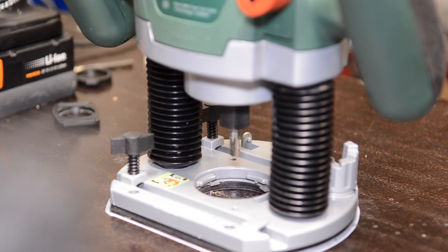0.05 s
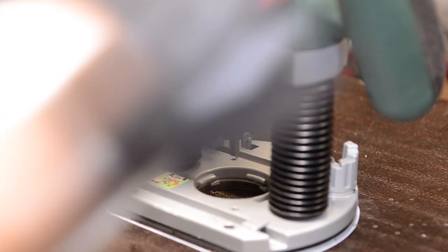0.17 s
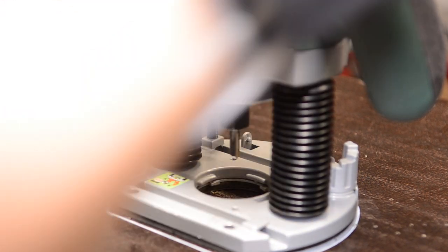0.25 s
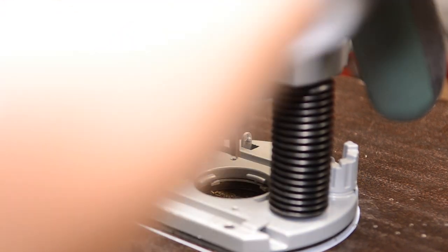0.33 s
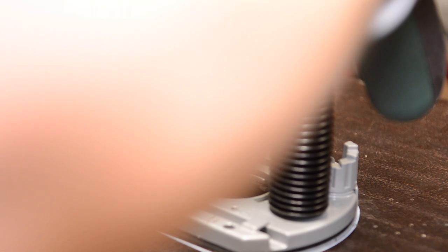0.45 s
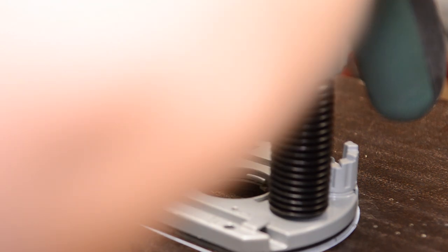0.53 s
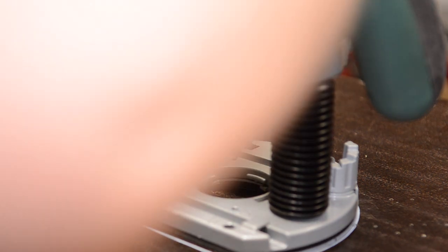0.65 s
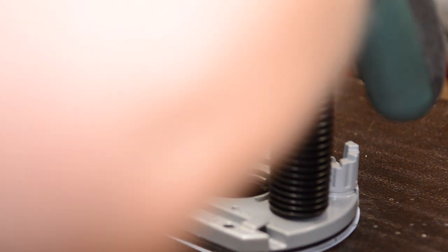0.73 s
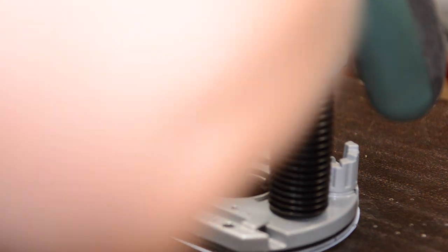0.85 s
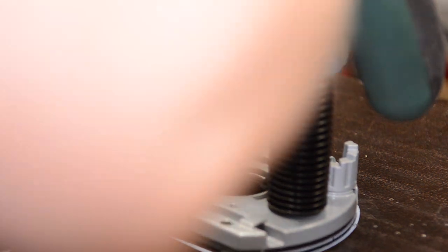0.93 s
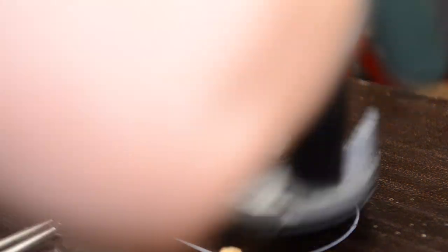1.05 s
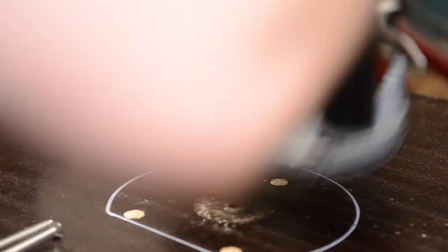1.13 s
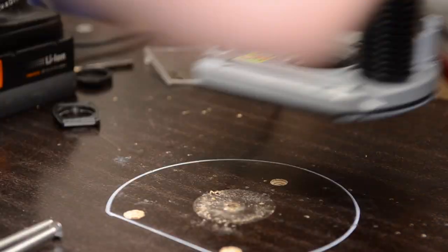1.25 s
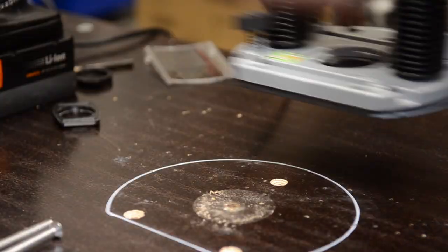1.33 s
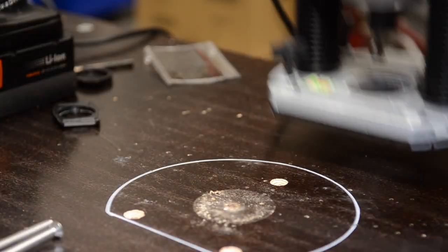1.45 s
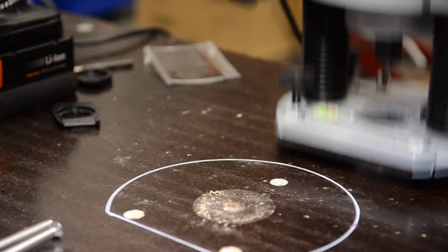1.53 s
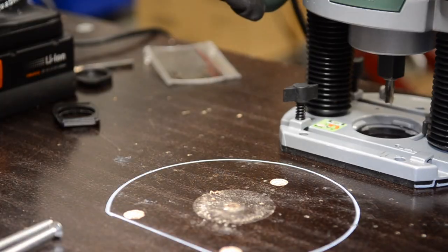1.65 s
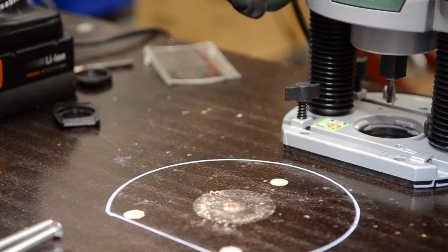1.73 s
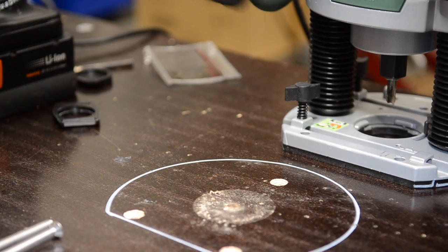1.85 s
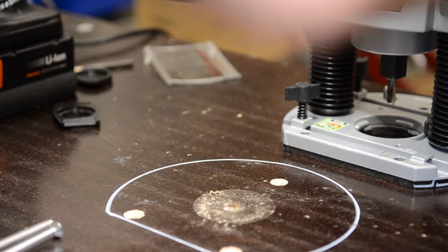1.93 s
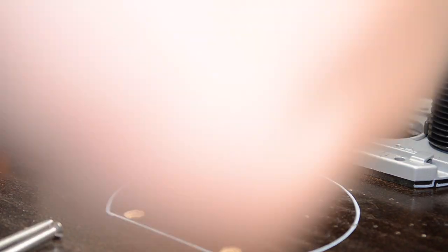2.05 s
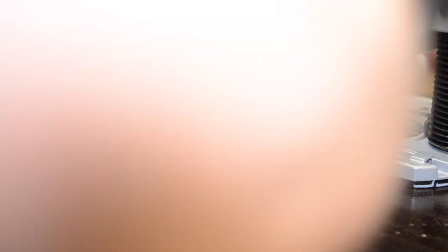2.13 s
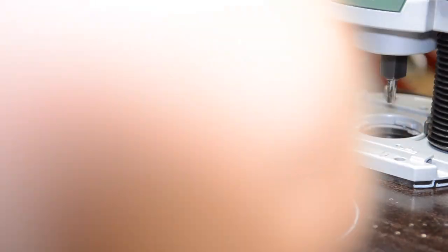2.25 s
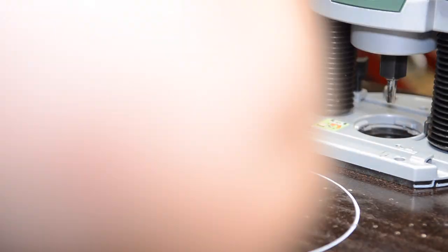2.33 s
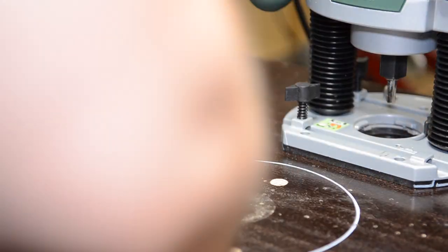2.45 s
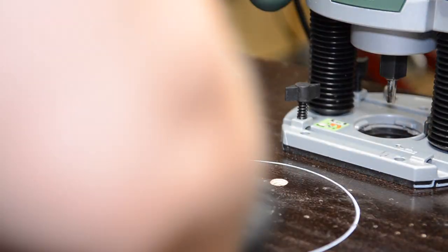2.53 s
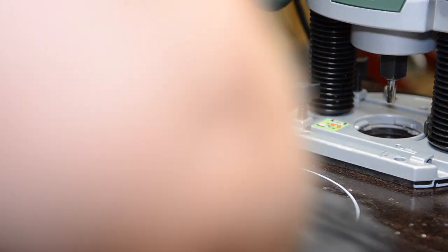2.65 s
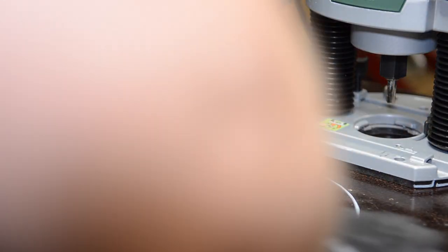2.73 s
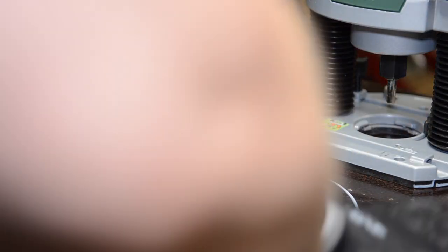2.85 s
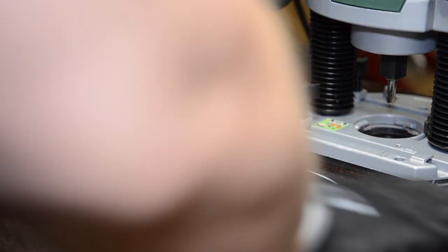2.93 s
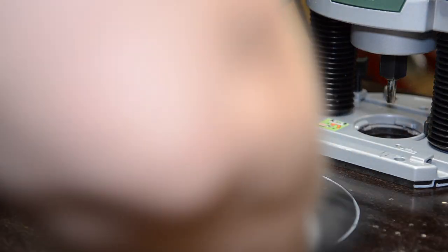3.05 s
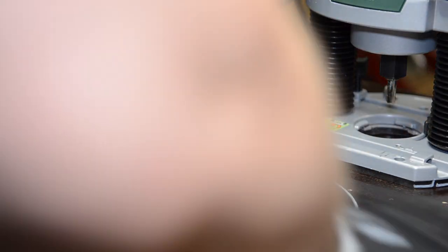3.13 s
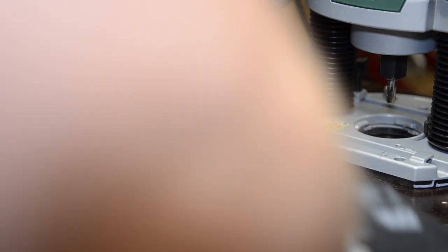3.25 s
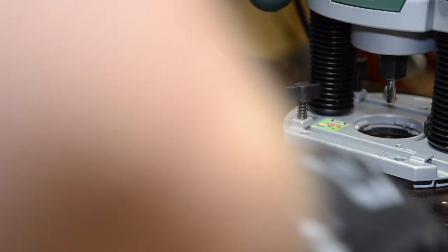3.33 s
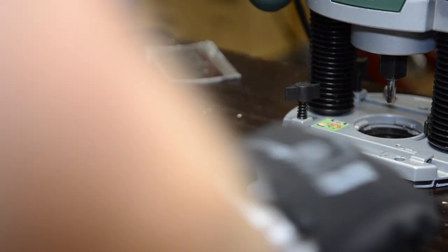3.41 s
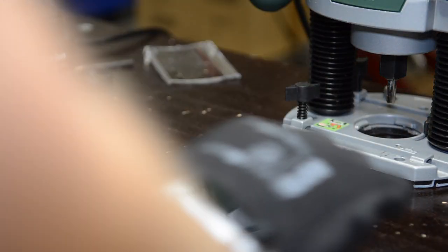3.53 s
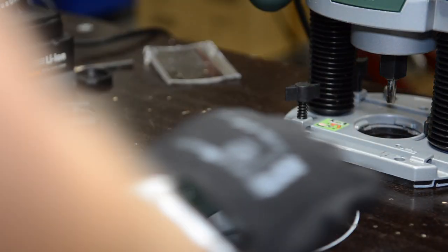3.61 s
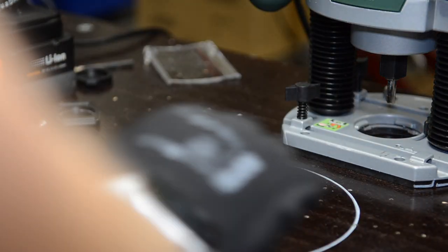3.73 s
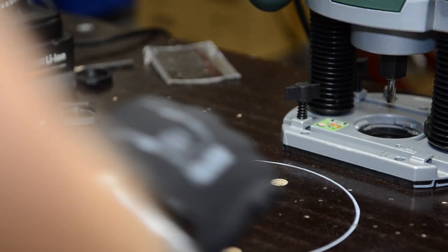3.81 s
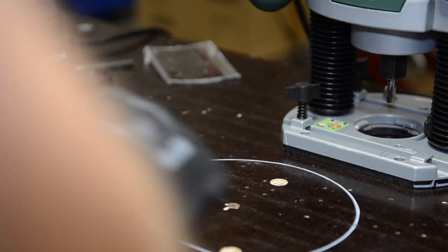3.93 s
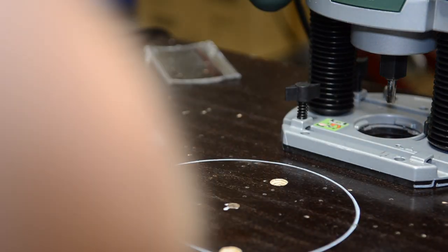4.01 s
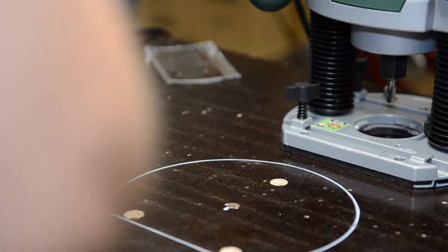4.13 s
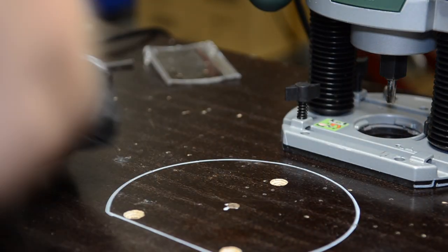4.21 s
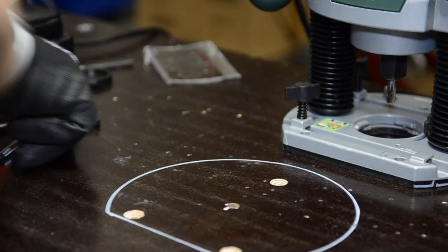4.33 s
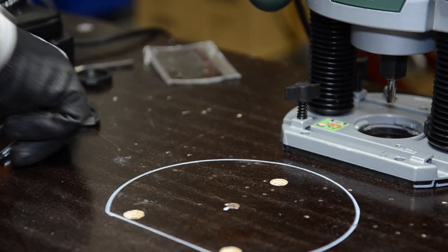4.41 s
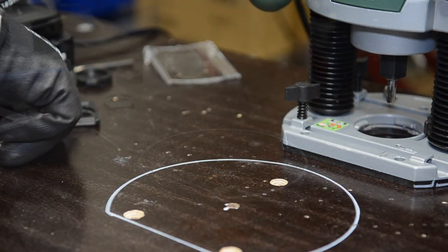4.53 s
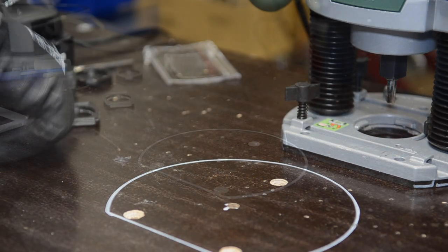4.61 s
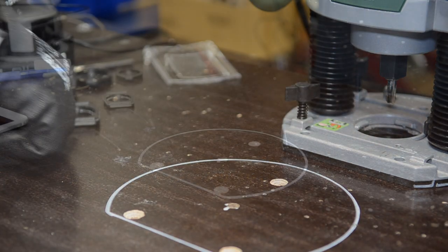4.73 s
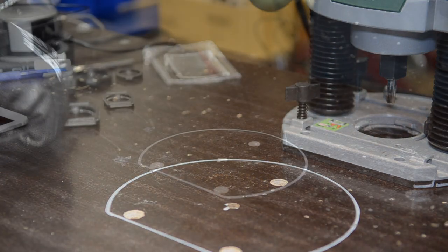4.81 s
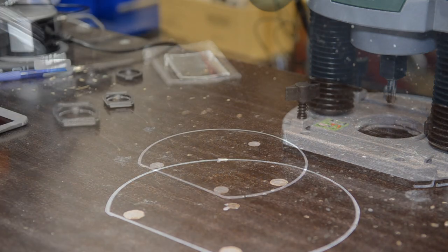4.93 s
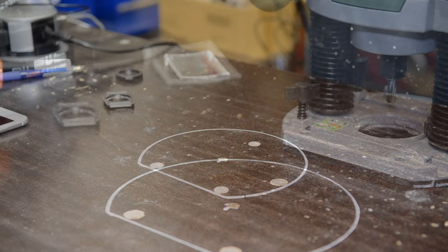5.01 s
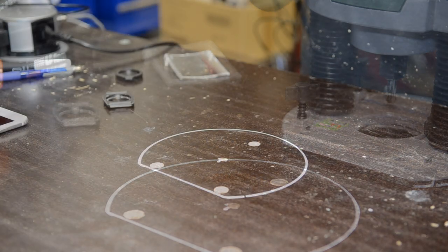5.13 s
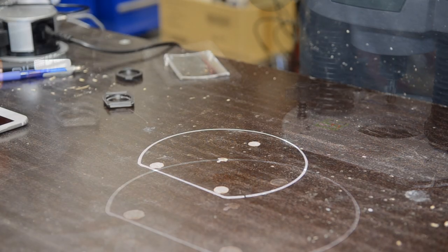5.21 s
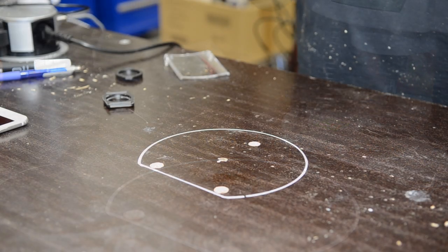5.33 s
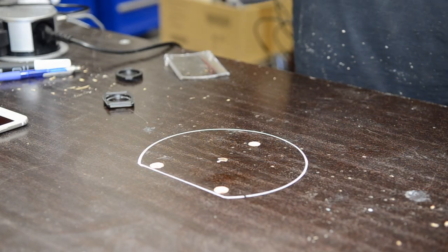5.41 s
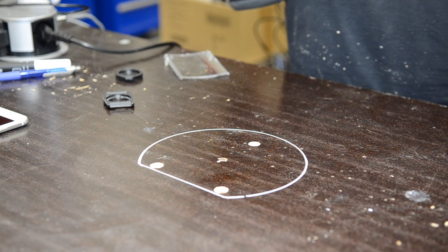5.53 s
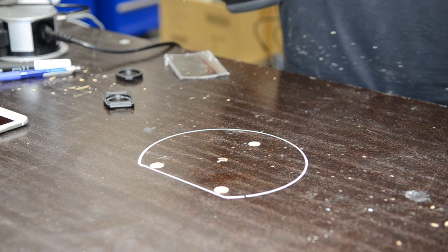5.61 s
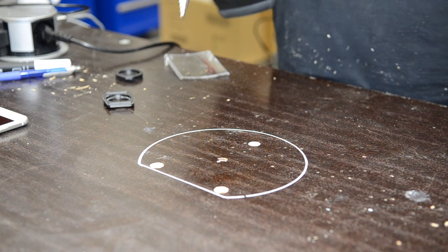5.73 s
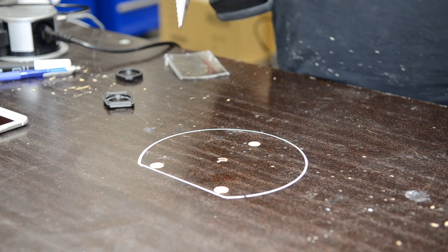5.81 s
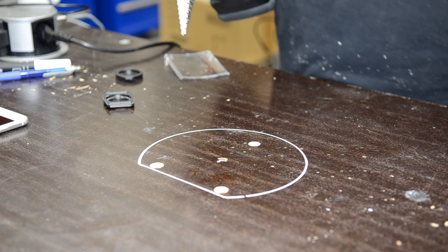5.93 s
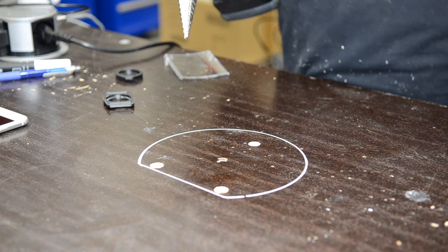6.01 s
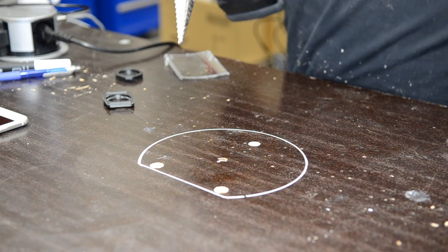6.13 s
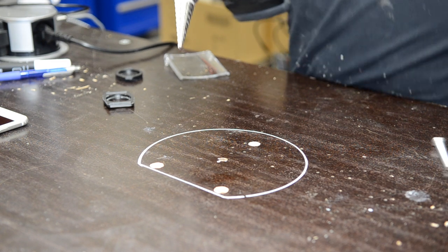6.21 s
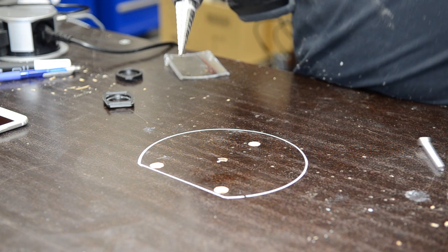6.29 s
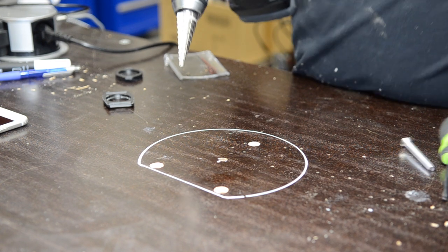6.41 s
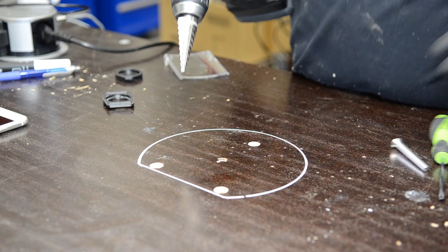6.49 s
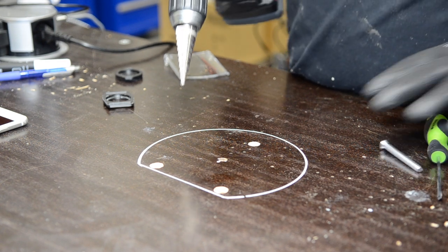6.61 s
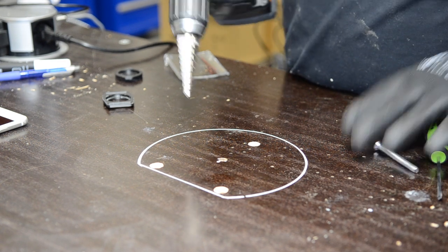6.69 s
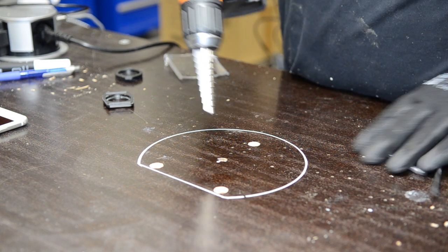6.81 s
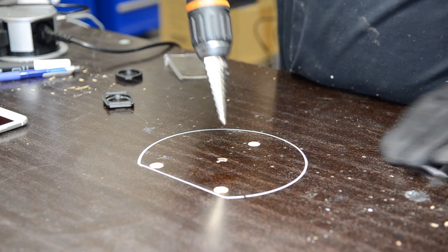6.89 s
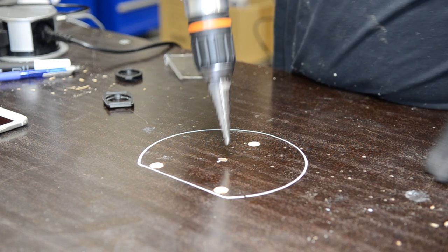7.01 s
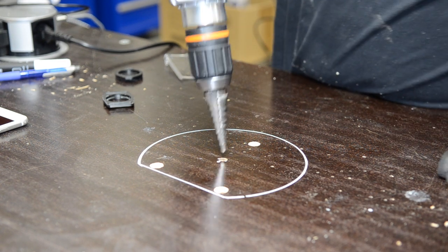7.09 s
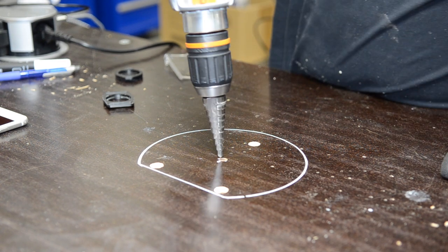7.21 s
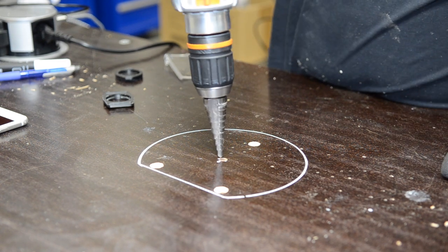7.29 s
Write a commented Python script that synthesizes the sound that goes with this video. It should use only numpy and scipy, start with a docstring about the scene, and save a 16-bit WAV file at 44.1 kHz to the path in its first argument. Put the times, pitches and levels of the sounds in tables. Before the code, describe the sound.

A small part bounces on a wooden workbench, a router lands, parts slide and squeak, screws clink, heavy bumps follow, then steel scrapes along.

```python
"""A dropped part bounces on a wooden workbench, a router lands at 1.6 s, then parts slide and squeak over the top.
Steel screws chime at 4.5 s, heavy bumps and a rattling tool follow at 5 s, then steel scrapes along with slides.
Contacts excite decaying modes and filtered noise bursts; friction and cloth are random grains; squeaks are rough tones.
Noise reflections form a small workshop; still air lies under all, a low sine hum fades out from 5.18 s."""
import sys
import numpy as np
from scipy import signal
from scipy.fft import rfft, irfft
from scipy.io import wavfile
from scipy.ndimage import map_coordinates

SR = 44100
rng = np.random.default_rng(int(sys.argv[2]) if len(sys.argv) > 2 else 0)


def generate_wav(sig):
    """Save sig (samples, or channels by samples) to the path in sys.argv[1] as 16-bit PCM at SR."""
    pcm = np.round(np.clip(np.atleast_2d(sig).T, -1, 1) * 32767).astype(np.int16)
    wavfile.write(sys.argv[1], SR, pcm)


N = 324120
TIME = np.arange(N) / SR
RING = TIME[:SR // 2]  # time axis of one contact, s

# Bench top under a heavy blow. Each row: nominal mode in Hz, relative level in dB, t60 in seconds.
BENCH = [(95, -0.5, 0.12), (171, -7, 0.26), (200.8, -13, 0.42), (235.7, -6, 0.11), (343, 11.5, 0.042),
         (621, -9.5, 0.09), (675, -3.5, 0.08), (858, -3.5, 0.24), (1140, 4.5, 0.049), (1340, -4, .03)]
# Bench top under a small hard part. Each row: nominal mode in Hz, relative level in dB, t60 in seconds.
PATCH = [(654, -5, 0.052), (904, 2, 0.014), (1140, 7, 0.02), (1179, -8.5, 0.059), (1638, -7, 0.063),
         (1740, -4.5, 0.0077)]
# Spectrum of the dense short-lived modes behind a heavy blow. Each row: frequency in Hz, relative level in dB.
BLOW_COLOUR = [(50, -30.5), (150, 5.5), (350, -4.5), (500, 1.5), (1000, 2), (1700, -2.5), (3000, -7),
               (4200, -15), (7000, -21.5), (9500, -39), (15000, -50)]
# Spectrum of friction slips and snags. Each row: frequency in Hz, relative level in dB.
SLIDE_COLOUR = [(100, 18), (240, -1), (400, -14), (580, 0.5), (900, 7.5), (1420, 3.5), (1700, 4),
                (2050, -8.5), (2400, -5), (3000, -12), (3700, -33), (15000, -43)]


def undb(db):
    """Decibels to gain."""
    return 10 ** (np.asarray(db) / 20)


def unit(x):
    """Scale to an energy of one."""
    return x / np.sqrt(np.sum(x ** 2))


def steady(x):
    """Scale to a standard deviation of one."""
    return x / np.std(x)


def fade(t, t60):
    """Exponential decay, 60 dB down after t60."""
    return np.exp(-np.log(1000) * t / t60)


def cut(x, hz, kind, order=2):
    """Butterworth low-pass or high-pass."""
    return signal.sosfilt(signal.butter(order, min(hz, SR * .45), kind, fs=SR, output="sos"), x)


def through(x, response):
    """Let x excite something with this impulse response."""
    return signal.fftconvolve(x, response)[:len(x)]


def colour(x, points, size=4096):
    """Minimum-phase filter with a spectrum of (Hz, dB) points."""
    hz, db = np.transpose(points)
    grid_hz = np.maximum(np.arange(size // 2 + 1) * SR / size, 1)
    gain_db = np.interp(np.log(grid_hz), np.log(hz), db)
    cepstrum = irfft(np.log(undb(gain_db)))
    # fold the cepstrum to make the response causal
    cepstrum[1:size // 2] *= 2
    cepstrum[size // 2 + 1:] = 0
    return through(x, irfft(np.exp(rfft(cepstrum))))


def wander(hz):
    """Low-passed noise with a spread of one."""
    return steady(cut(rng.standard_normal(N), hz, "low"))


def drift(x, share, hz):
    """Resonances slide up and down as the contact point travels: time is read at a wandering speed."""
    return map_coordinates(x, [np.arange(N) + np.cumsum(share * wander(hz))], mode="mirror")


def grains(per_s, spread_db):
    """Tiny slips at random moments, of uneven size and random sign."""
    hits = rng.random(N) < per_s / SR
    size_db = spread_db * np.clip(rng.standard_normal(N), -2, 2)
    return hits * rng.choice([-1, 1], N) * undb(size_db)


def ring(modes, scatter=0.0061):
    """Decaying modes of alternating sign; each contact loads them a little differently."""
    total = 0
    for k, (hz, db, t60) in enumerate(modes):
        loaded_hz = hz * (1 + scatter * rng.standard_normal())
        total = total + (-1) ** k * undb(db) * fade(RING, t60) * np.sin(2 * np.pi * loaded_hz * RING)
    return unit(total)


def crack(points, t60, tick_db):
    """The first push of a contact and the dense modes that die right after it."""
    burst = unit(rng.standard_normal(len(RING)) * fade(RING, t60))
    burst[0] += undb(tick_db)
    return unit(colour(burst, points))


def add(track, s, db, sound):
    """Place a sound at s; db is its energy spread over 10 ms."""
    start = max(int(s * SR), 0)
    part = (unit(sound) * undb(db) * np.sqrt(SR / 100))[:N - start]
    track[start:start + len(part)] += part


def strikes(table, modes, points, modes_db, crack_t60, tick_db):
    """Blows on the bench: a soft contact loses the treble, a light part cannot move the bass."""
    out = np.zeros(N)
    for s, db, corner_hz, bass_hz in table:
        body = crack(points, crack_t60, tick_db) + undb(modes_db) * ring(modes)
        add(out, s, db, cut(cut(body, corner_hz, "low"), bass_hz, "high"))
    return out


def router(modes_db=-3.5, snap_t60=0.013):
    """The router lands and rocks on its metal base, with sharp snaps and a boom of the bench."""
    # Each row: start in seconds, level in dB, contact corner in Hz, bass cut in Hz.
    landings = [(1.5971, -11, 5660, 170), (1.609, -20, 416, 299), (1.657, -22.5, 455, 84)]
    # Each row: start in seconds, level in dB.
    snaps = [(1.5969, -24.5), (1.708, -54)]
    # Each row: frequency in Hz, relative level in dB.
    snap_colour = [(500, -13), (1100, 15.5), (1900, -0.5), (2900, -2), (4000, -4), (7400, -3), (9200, -14),
                   (15500, -37)]
    out = strikes(landings, BENCH, BLOW_COLOUR, modes_db, crack_t60=0.032, tick_db=-4.0)
    for s, db in snaps:
        add(out, s, db, crack(snap_colour, snap_t60, tick_db=-5))
    return out


def thumps():
    """Heavy things bump the bench and excite its low bending modes."""
    # Each row: start in seconds, level in dB, contact corner in Hz, bass cut in Hz.
    bumps = [(.947, -49.5, 206, 88.6), (2.47, -48, 194, 79.6), (3.535, -47.5, 342, 223),
             (4.633, -39, 300, 220), (4.917, -21.5, 1010, 131), (4.923, -23, 217, 69),
             (4.981, -23, 1130, 160), (4.987, -35, 905, 300), (5.031, -30.5, 885, 110),
             (5.064, -32.5, 334, 60), (5.098, -30.5, 150, 121), (5.225, -36.5, 133, 105),
             (5.650, -38, 280, 40), (5.672, -37, 166, 60.5), (5.76, -48, 760, 201),
             (6.118, -39, 600, 101.5), (6.788, -35, 590, 240), (7.19, -37, 160, 59.3)]
    return strikes(bumps, BENCH, BLOW_COLOUR, modes_db=-5.5, crack_t60=0.085, tick_db=-8.5)


def bounces(count=7, drop_s=0.0102, drop_db=-24.5, corner_hz=3100, bass_hz=383,
            first_hop_s=.0305, restitution=.82, hop_loss_db=1.54):
    """Clacks of the dropped part: every hop lasts a fixed share of the one before and lands weaker."""
    hop = np.arange(count)
    hops_s = first_hop_s * restitution ** hop[:-1]
    times = drop_s + np.append(0, np.cumsum(hops_s))
    return [(s, drop_db - hop_loss_db * k, corner_hz, bass_hz) for k, s in enumerate(times)]


def clacks():
    """Small hard parts, among them the bouncing one, excite a patch of the bench top."""
    # Each row: start in seconds, level in dB, contact corner in Hz, bass cut in Hz.
    knocks = [(0.852, -43.5, 3620, 950), (2.498, -43, 1470, 810), (3.513, -34, 3000, 298),
              (4.6285, -18.5, 5030, 850), (4.6345, -25.5, 1200, 400), (5.0612, -27, 750, 1000),
              (5.079, -32, 3220, 690), (5.155, -34.5, 1300, 596), (5.649, -47, 1490, 914),
              (6.451, -39.5, 1710, 302)]
    # Each row: frequency in Hz, relative level in dB.
    clack_colour = [(100, -20), (300, 0), (600, 5), (1150, 3.5), (1900, -1.5), (3300, -5.5), (3900, -22),
                    (7000, -22), (15000, -20.5)]
    return strikes(bounces() + knocks, PATCH, clack_colour, modes_db=-4, crack_t60=.03, tick_db=-9)


def blows():
    """Everything that strikes the bench: the router, heavy bumps and small hard parts."""
    return router() + thumps() + clacks()


def steel(tick_db=-13.5, tick_t60=0.018, choke_t60=0.012, rattle_t60=0.35):
    """Screws tick and chime in two bending modes, each touch choking the last; a larger tool rattles."""
    # Each row: start in seconds, level in dB, second mode minus first in dB.
    chimes = [(.002, -38.5, 4), (0.162, -62, 14), (3.47, -64, 17), (3.515, -58, 6), (4.459, -35.5, -1),
              (4.487, -44.5, -2), (4.5091, -36.5, 9), (4.52, -37, 26), (4.539, -37.5, 9),
              (4.547, -43, 32.5), (4.552, -56, 36), (4.629, -38, 25), (4.634, -52, 22), (7.02, -71, 7)]
    # Bending modes of a screw. Each row: nominal frequency in Hz, t60 in seconds.
    screw = [(4790, 0.2), (12945, 0.19)]
    # Each row: start in seconds, level in dB.
    rattles = [(5.077, -30), (5.096, -36)]
    # Each row: nominal mode in Hz, relative level in dB, t60 in seconds.
    tool = [(980, 10.5, 0.063), (1580, 7, 0.028), (2235, 6.5, 0.027), (2820, 1, 0.026), (3640, 0, 0.022),
            (4300, 4.5, 0.0022), (9400, -42, 0.34)]
    out = np.zeros(N)
    (low_hz, low_t60), (high_hz, high_t60) = screw
    gaps = np.diff([row[0] for row in chimes], append=TIME[-1])
    for (s, db, high_db), gap in zip(chimes, gaps):
        tick = unit(cut(rng.standard_normal(len(RING)) * fade(RING, tick_t60), 5000, "high"))
        chime = ring([(low_hz, 0, low_t60), (high_hz, high_db, high_t60)], scatter=0.0039)
        chime = chime * fade(np.maximum(RING - gap, 0), choke_t60)
        add(out, s, db, unit(chime) + undb(tick_db) * tick)
    for s, db in rattles:
        hits = grains(per_s=370, spread_db=1)[:len(RING)] * fade(RING, rattle_t60)
        add(out, s, db, through(hits, ring(tool, scatter=0.013)))
    return out


def push(s, length, swell_db, attack_s=0.049, t60_s=0.19, coast_per_length=2.5):
    """A stroke starts quickly, its pressure grows or eases evenly, then it coasts to rest; a short jab stops sooner."""
    t = TIME - s
    start = np.clip(t / min(attack_s, length), 0, 1)
    coast = fade(np.maximum(t - length, 0), min(t60_s, coast_per_length * length))
    return start * undb(swell_db * (np.clip(t / length, 0, 1) - .5)) * coast


def slides(modes_db=-2, judder_hz=50, judder_db=1.5, top_hz=1900, dull_hz=6000, drift_share=.05,
           body_edge_hz=405, edge_hz_per_db=7.5):
    """Stick-slip grains ring the bench; weight brings out its bass, a biting edge its treble."""
    # Each row: start in seconds, length in seconds, level at mid-swell in dB, swell over the stroke in dB,
    # weight as bass in dB re level, bite as treble in dB re level.
    strokes = [(-.03, 0.19, -36.5, -19, -17.5, -1.5), (1.274, 0.33, -53, 0, -15.5, -10),
               (2.25, 0.38, -54, 4, -20.5, -9), (2.583, 0.39, -36, 4, -34.5, -17.5),
               (2.974, 0.42, -36, 4.5, -34.5, -17.5), (3.326, 0.15, -44.5, 9, -22, -14),
               (3.501, 0.083, -34, -16.5, -15.5, -9), (4.405, 0.026, -44, -3, -29, -7),
               (4.423, 0.13, -34.5, 4, -17, -7), (4.618, 0.022, -29, -0.5, -25, 4.5),
               (5.851, 0.3, -42, 1, -11.5, -22), (6.148, 0.4, -48, -5.5, -9, -27),
               (6.791, 0.35, -42, 4.5, -16, -13.5)]
    slips = grains(per_s=2600, spread_db=-0.5) * undb(judder_db * wander(judder_hz))
    # as the part travels it passes the nodes and bellies of each mode
    modes = 0
    for hz, db, t60 in PATCH:
        modes = modes + undb(db + 2.5 * wander(9)) * through(slips, ring([(hz, 0, t60)]))
    modes = steady(drift(modes, drift_share, hz=6))
    wood = steady(colour(slips, SLIDE_COLOUR)) + undb(modes_db) * modes
    bass = steady(cut(cut(wood, 460, "low", order=6), 171, "high", order=4))
    treble = steady(cut(cut(wood, top_hz, "high", order=6), dull_hz, "low"))
    out = np.zeros(N)
    for s, length, db, swell_db, weight_db, bite_db in strokes:
        # the lighter the part, the higher the lower edge of the wood's tone
        edge_hz = body_edge_hz - edge_hz_per_db * weight_db
        body = steady(cut(cut(wood, edge_hz, "high", order=4), top_hz, "low", order=4))
        tone = body + undb(weight_db) * bass + undb(bite_db) * treble
        out += undb(db) * push(s, length, swell_db) * tone
    return out


def catches(corner_hz=4000, bass_hz=700):
    """A sliding part snags on the grain and lets go with a dry tick."""
    # Each row: start in seconds, level in dB.
    snags = [(2.347, -47.5), (2.836, -33), (2.87, -40), (3.057, -36), (3.125, -42), (3.301, -38),
             (3.398, -37), (5.866, -54), (5.987, -39.5), (6.04, -40.5), (6.305, -42), (7.108, -43.5)]
    table = [(s, db, corner_hz, bass_hz) for s, db in snags]
    return strikes(table, PATCH, SLIDE_COLOUR, modes_db=-3.5, crack_t60=0.043, tick_db=-1)


def squeaks(jitter=.06, rough_db=2.5, stumble_hz=160, upper_ratio=1.7, upper_db=-8):
    """Friction drives two modes of the part; their pitch and strength stumble from slip to slip."""
    # Each row: start in seconds, length in seconds, level over that length in dB,
    # starting and final centre pitch of the lower mode in Hz.
    chatters = [(0.369, 0.088, -62, 2470, 2620), (0.951, 0.033, -64, 3710, 3540),
                (1.313, 0.48, -59, 803, 793), (2.286, 0.058, -43.5, 1136, 1045),
                (2.401, 0.061, -49, 1092, 1136), (2.638, 0.15, -36, 1185, 925),
                (2.789, 0.088, -33.5, 1053, 976), (2.937, 0.052, -42.5, 1121, 1174),
                (3.078, 0.08, -38.5, 955, 1052), (3.265, 0.097, -37.5, 1014, 1200),
                (3.356, 0.025, -37, 852, 845), (4.42, 0.034, -28.5, 1214, 1078),
                (4.461, 0.066, -45, 1182, 1155), (4.54, 0.017, -25.5, 1196, 1123),
                (5.888, 0.039, -43, 1133, 1120), (6.483, .17, -52, 765, 642),
                (6.678, 0.073, -51.5, 725, 730)]
    out = np.zeros(N)
    for s, length, db, first_hz, last_hz in chatters:
        hz = np.interp(RING, [0, length], [first_hz, last_hz])
        tone = 0
        for ratio, mode_db in (1, 0), (upper_ratio, upper_db):
            pitch, size = steady(cut(rng.standard_normal((2, len(RING))), stumble_hz, "low"))
            phase = 2 * np.pi * np.cumsum(ratio * hz * (1 + jitter * pitch)) / SR
            tone = tone + undb(mode_db + rough_db * size) * np.sin(phase)
        gate = np.clip(np.minimum(RING, length - RING) / .004 + .5, 0, 1)
        build = 1 - fade(RING, length * .6)
        # add() refers levels to 10 ms
        add(out, s, db + 10 * np.log10(length * 100), tone * gate * build)
    return out


def scrapes(per_s=450, spread_db=3, judder_hz=22, judder_db=3):
    """A steel shank rasps in fits and starts: coarse grains excite its own modes, which shift as it rolls."""
    # Each row: start in seconds, length in seconds, level at mid-swell in dB, swell over the stroke in dB.
    drags = [(5.86, 0.47, -49.5, -4), (6.79, 0.352, -44, 7)]
    # Each row: nominal mode in Hz, relative level in dB, t60 in seconds.
    shank = [(700.6, -5, 0.071), (1677, -4.5, 0.042), (2343, -2.5, 0.02), (2960, -6.5, 0.0054)]
    grit = grains(per_s, spread_db) * undb(judder_db * wander(judder_hz))
    rasp = steady(drift(through(grit, ring(shank)), share=.025, hz=6))
    return rasp * sum(undb(db) * push(s, length, swell_db) for s, length, db, swell_db in drags)


def rustle(swish_low_hz=4500, swish_high_hz=11500, stir_db=-68.5, stir_swing_db=1.5):
    """Cloth fibres catch and let go, never quite still; each brush swells and sinks, and a quick one swishes."""
    # Each row: height in seconds, length in seconds, cloth level in dB, swish as treble in dB re cloth.
    brushes = [(0.398, 0.64, -60, -24), (.75, 0.057, -59.5, -4), (0.908, 0.2, -57, -23),
               (1.837, 0.11, -56.5, -25), (2.693, 0.48, -56, -21), (2.992, .014, -59, -7),
               (3.156, 0.38, -60, -12.5), (5.408, 0.27, -62.5, -19), (5.999, 0.033, -54.5, -17),
               (6.436, 0.1, -54, -32)]
    # Each row: frequency in Hz, relative level in dB.
    rustle_colour = [(150, -25.5), (500, 4), (1000, 8), (2500, 6.5), (3700, 0.5), (5500, -10), (10000, -19),
                     (15000, -20.5)]
    fibres = grains(per_s=5800, spread_db=-2.5)
    cloth = steady(colour(fibres, rustle_colour))
    swish = steady(cut(cut(rng.standard_normal(N), swish_low_hz, "high"), swish_high_hz, "low"))
    out = cloth * undb(stir_db + stir_swing_db * wander(0.77))
    brushed = np.roll(cloth, N // 2)  # other grains than the constant stir
    for s, length, db, swish_db in brushes:
        swell = np.exp(-(2 * (TIME - s) / length) ** 2)
        out += undb(db) * swell * (brushed + undb(swish_db) * swish)
    return out


def background(waver_db=2.5, hum_fades_s=5.18, hum_t60_s=0.53, air_db=-59.5):
    """A low hum, slightly unsteady, fades out over the still air of the room."""
    # Each row: frequency in Hz, rms level before waver and fade in dB.
    hum_partials = [(69.9, -55), (139.8, -65.5)]
    # Each row: frequency in Hz, relative level in dB.
    air_colour = [(25, -34), (50, -2), (110, 2), (250, -5.5), (1700, -7.5), (4000, -31), (12000, -35.5),
                  (15500, -56)]
    hum = sum(undb(db) * steady(np.sin(2 * np.pi * (hz * TIME + rng.random()))) for hz, db in hum_partials)
    hum = hum * undb(waver_db * wander(3)) * fade(np.maximum(TIME - hum_fades_s, 0), hum_t60_s)
    air = steady(colour(rng.standard_normal(N), air_colour))
    return hum + undb(air_db) * air


def reflections(x, room_db=-1.5, treble_db=-6, split_hz=3000, build_s=0.0031, room_t60_s=0.62, halving_hz=10500):
    """The workshop's reflections thicken, then fade; soft surfaces and air eat the treble sooner."""
    t = TIME[:SR]
    hz = np.fft.rfftfreq(SR, 1 / SR)
    noise = rfft(rng.standard_normal(SR) * (1 - np.exp(-(t / build_s) ** 2)))
    tail = 0
    for centre_hz in range(0, 17000, 1000):  # overlapping triangular bands
        band = irfft(noise * np.maximum(1 - abs(hz - centre_hz) / 1000, 0))
        t60_s = room_t60_s / (1 + (centre_hz / halving_hz) ** 2)  # half as long at halving_hz
        tail = tail + band * fade(t, t60_s) * undb(treble_db * min(centre_hz / split_hz, 1))
    return undb(room_db) * through(x, tail / np.linalg.norm(fade(t, room_t60_s)))


def scene():
    """All contacts share one room; a blow radiates another tone in each direction, and the walls return them."""
    # fresh draws of the same blows stand for other directions
    returned = sum(reflections(blows()) for _ in range(2)) / np.sqrt(2)
    struck = blows() + returned
    places = steel() + scrapes() + squeaks(), slides() + catches() + rustle()
    handled = sum(sound + reflections(sound) for sound in places)
    return (struck + handled + background())[None]


def record(dry, top_hz=15700):
    """Loses the deepest bass and cuts the top steeply."""
    no_rumble = cut(dry, 37, "high", order=4)
    return signal.sosfilt(signal.ellip(8, .2, 70, top_hz, fs=SR, output="sos"), no_rumble)


dry = scene()
out = record(dry)
generate_wav(out)
```